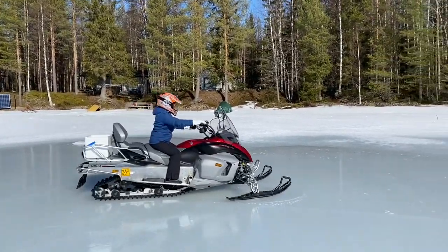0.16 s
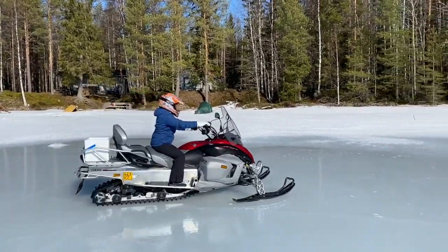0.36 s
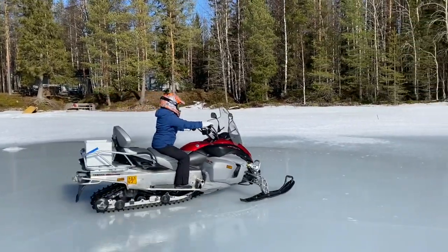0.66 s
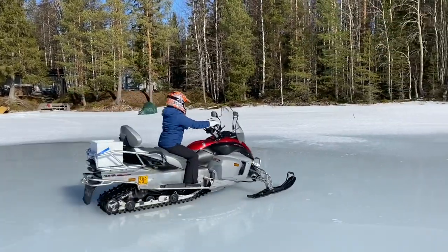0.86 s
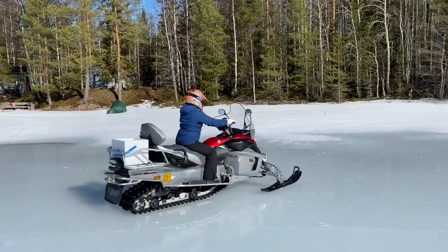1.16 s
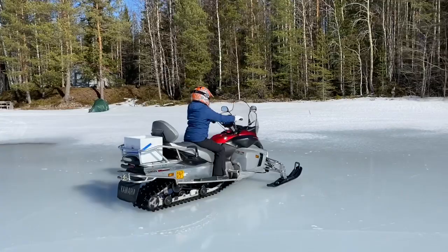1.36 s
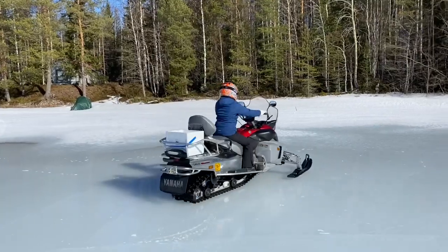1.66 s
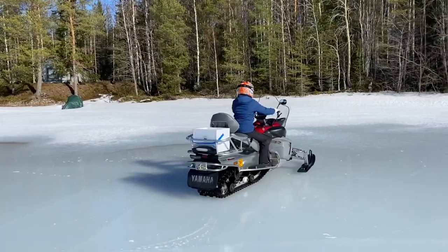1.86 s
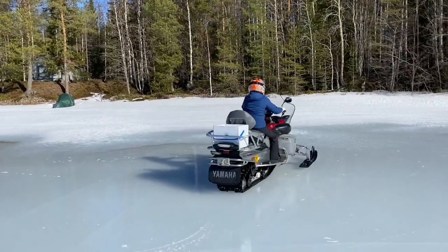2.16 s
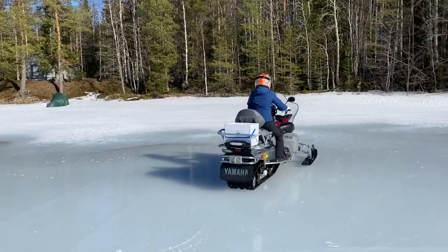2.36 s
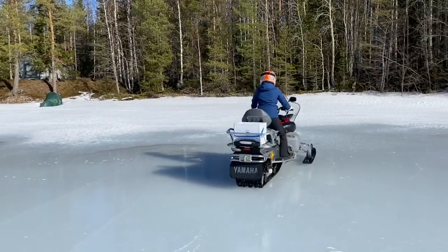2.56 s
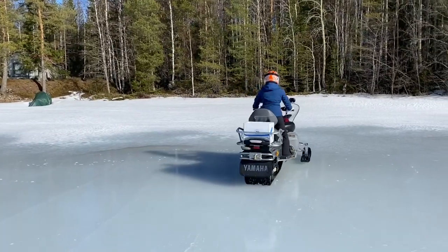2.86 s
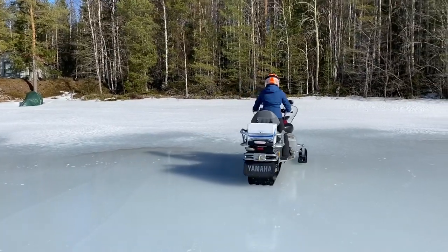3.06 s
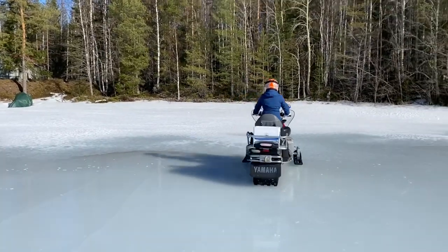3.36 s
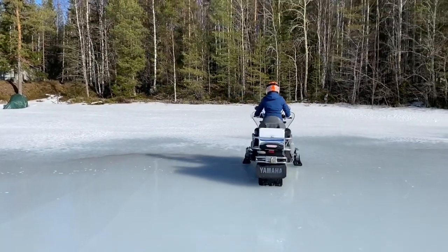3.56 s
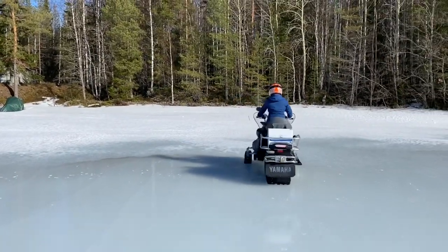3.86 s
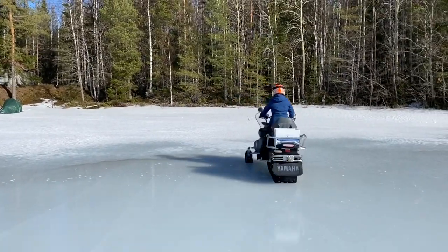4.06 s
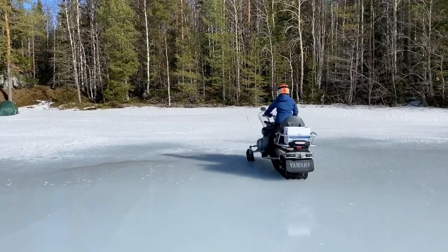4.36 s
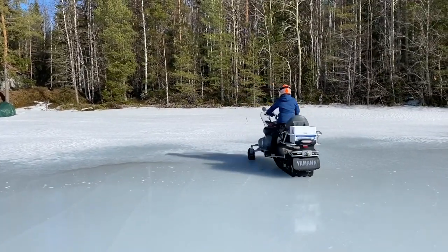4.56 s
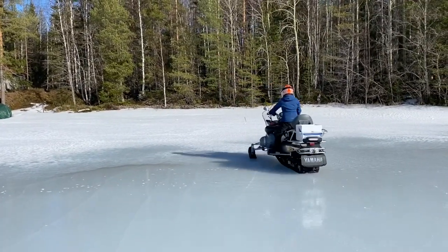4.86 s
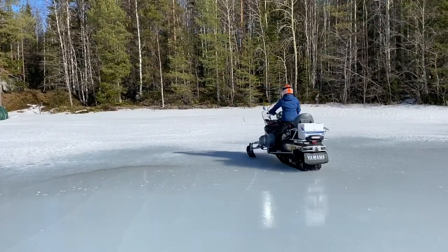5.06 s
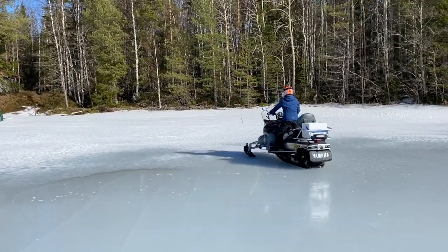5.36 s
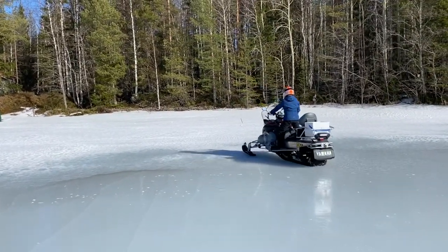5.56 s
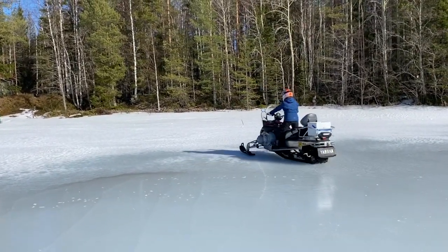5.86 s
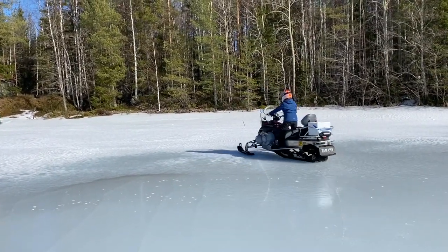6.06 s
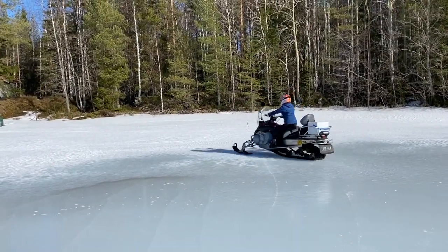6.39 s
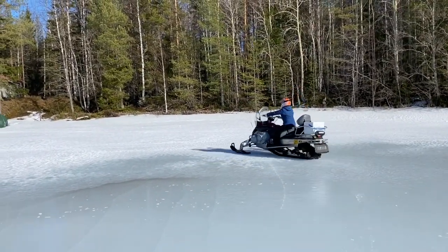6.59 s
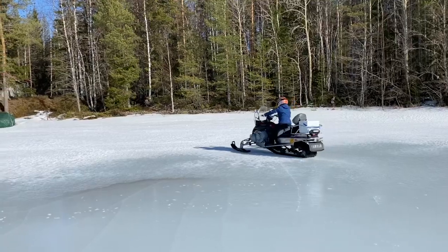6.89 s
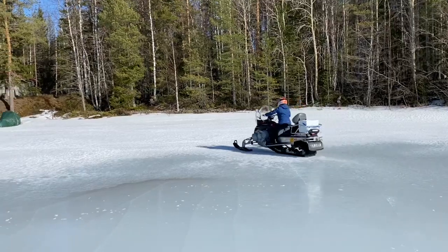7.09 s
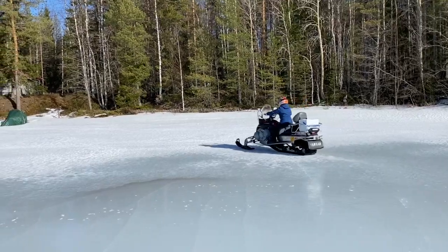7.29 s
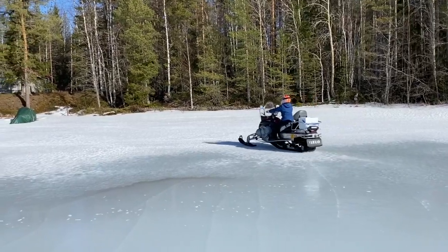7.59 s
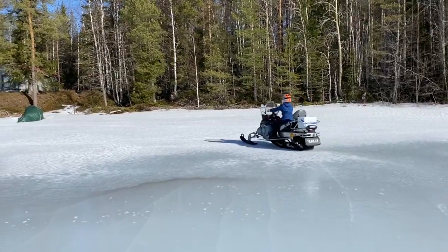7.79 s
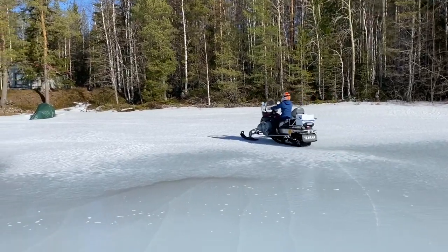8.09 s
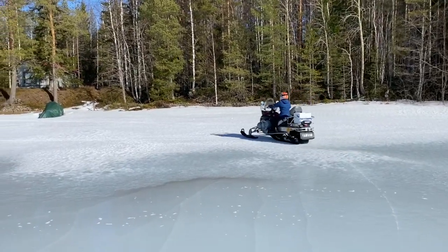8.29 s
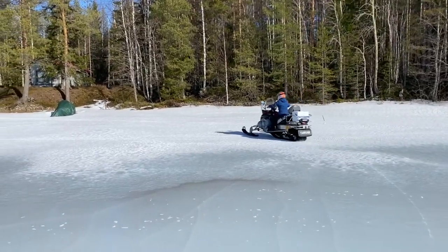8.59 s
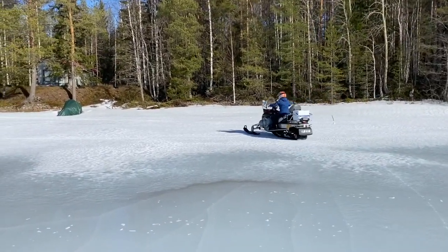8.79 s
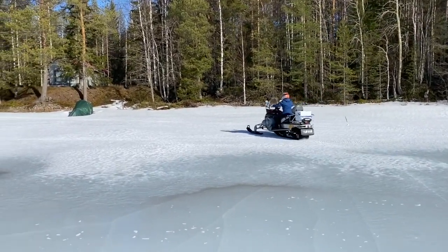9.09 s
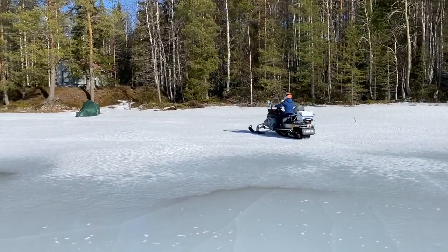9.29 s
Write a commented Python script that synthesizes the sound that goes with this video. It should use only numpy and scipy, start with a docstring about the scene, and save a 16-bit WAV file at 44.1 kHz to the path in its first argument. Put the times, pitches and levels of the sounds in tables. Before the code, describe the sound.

A snowmobile slides to rest and idles with a lumpy double-puff putter on a frozen lake, then revs up, sinks and climbs again.

```python
"""A four-stroke twin snowmobile on a frozen lake, heard by a small microphone with two ports.
First the track slides to rest and the engine idles: each cycle is a double puff from the silencer and a pause,
over a throbbing rattle of valve gear, belt and track, while skis knock on the ice. From 3 s it revs up, the belt
whines, and by 5.9 s it sinks with squeaks; it climbs to 7.9 s, sinks, and picks up again at the end.
Clicks ring silencer, airbox and valve gear; coloured noise makes rumble, roar, rattle, hiss and scrape."""
import sys
import numpy as np
from scipy import signal
from scipy.fft import rfft, irfft
from scipy.io import wavfile
from scipy.ndimage import uniform_filter1d

SR = 44100
rng = np.random.default_rng(int(sys.argv[2]) if len(sys.argv) > 2 else 0)


def wav_out(sig):
    """Save sig, one row per channel (or a flat mono array), as 16-bit PCM at SR to the path in sys.argv[1]."""
    wavfile.write(sys.argv[1], SR, np.round(np.clip(np.atleast_2d(sig).T, -1, 1) * 32767).astype(np.int16))


N = 416304
SECONDS = np.arange(N) / SR
HZ = np.arange(N // 2 + 1) * SR / N


def from_db(db):
    """Decibels to gain."""
    return 10 ** (np.asarray(db) / 20)


def rms_one(x):
    """Scale to unit rms."""
    return x / np.sqrt(np.mean(x ** 2) + 1e-20)


def in_time(rows):
    """Columns of a curve table, one value a sample."""
    s, *columns = np.transpose(rows)
    return [np.interp(SECONDS, s, column) for column in columns]


def at_hz(points):
    """A table over frequency, read at every FFT bin along a logarithmic axis."""
    hz, value = np.transpose(points)
    return np.interp(np.log(HZ + 1), np.log(hz + 1), value)


def filtered(x, order, hz, kind="low"):
    """Butterworth low-pass or high-pass."""
    return signal.sosfilt(signal.butter(order, hz, kind, fs=SR, output="sos"), x)


def drift(corner_hz):
    """Slow chance with spread 1: noise through two equal poles, drawn every 40 samples."""
    r = np.exp(-80 * np.pi * corner_hz / SR)
    slow = signal.lfilter([1], [1, -2 * r, r * r], rng.standard_normal(N // 40 + 2002))
    slow = slow[2000:]   # skip the filter's settling
    return np.interp(np.arange(N) / 40, np.arange(len(slow)), rms_one(slow))


def pole_pair(hz, width_hz):
    """Pole radius and denominator of a two-pole ring."""
    r = np.exp(-np.pi * width_hz / SR)
    return r, [1, -2 * r * np.cos(2 * np.pi * hz / SR), r * r]


def resonance(x, hz, width_hz):
    """Two-pole peak with gain 1 on top."""
    r, poles = pole_pair(hz, width_hz)
    return signal.lfilter([(1 - r * r) / 2, 0, (r * r - 1) / 2], poles, x)


def held_back(x, hz, width_hz):
    """All-pass: delays a band, changes no level."""
    _, poles = pole_pair(hz, width_hz)
    return signal.lfilter(poles[::-1], poles, x)


def evened(x):
    """Slow level divided out, to be played by a level curve."""
    power = uniform_filter1d(uniform_filter1d(x ** 2, size=SR // 6), size=SR // 6)
    return x / np.sqrt(power + 1e-14)


def struck(events, modes, burst_s, spread_db):
    """Each contact is a short burst of grit that rings every mode with a strength of its own."""
    s, peak_db, bright_db = np.transpose(events)
    out, width = np.zeros(N), int(burst_s * SR) + 1
    at = (s * SR).astype(int)[:, None] + np.arange(width)
    luck = rng.standard_normal((len(s), len(modes), width + 1))
    for k, (hz, level_db, t60_s) in enumerate(modes):
        octaves_up = np.log2(max(hz / modes[0][0], 1))   # above the first mode
        own_db = spread_db * np.minimum(luck[:, k, 0], 1.3)
        gain = from_db(peak_db + level_db + bright_db * octaves_up + own_db)
        grit = np.full(N + SR, 1e-18)
        np.add.at(grit, at, gain[:, None] * luck[:, k, 1:] / np.sqrt(width))
        r, turn = from_db(-60 / (t60_s * SR)), 2 * np.pi * hz / SR
        out += signal.lfilter([0, np.sin(turn)], [1, -2 * r * np.cos(turn), r * r], grit[:N])
    return out


# How alike left and right are: pitch_hz, likeness (0-1)
LIKENESS = [(60, .4), (300, .82), (1500, .98), (2600, .9), (3100, .72), (4600, .85), (5500, .7), (6300, .2),
            (7300, .55), (8000, .4), (9500, .5), (11000, .85), (12200, .6), (13300, .98)]
# Covers and tunnel that ring along, each heard best from another side:
# pitch_hz, width_hz, then lift_db in each of the three views
PANELS = [(690, 88, 1.5, 5, 7.5), (860, 130, 4.5, 0.5, 3), (1264, 30, 12, -2, 1), (1640, 143, 10, 8, 5),
          (1837, 130, 1.5, 3.5, 6), (2503, 31, 13, 6.5, 2.5), (2608, 69, -5, 5.5, 7),
          (3153, 90, 11, 9.5, 8), (3835, 150, 7, 5.5, -6.5), (4060, 250, 1, 0.5, 8.5),
          (4300, 88, 9.5, 9.5, -11), (4710, 240, 1, 3, 6), (5100, 490, 4.5, 8, 6.5), (6220, 60, -2, 9, 3),
          (7280, 130, 0, 4, 3), (7660, 130, 2, 0, 4), (8400, 220, 5, 6, 5.5), (10330, 160, -1, -5, 0)]
# The machine turns: start_s, view (0 right flank and tail, 1 tail, 2 left flank)
VIEW = [(0, 0), (3.0, 0), (3.8, 1), (6.4, 1), (7.1, 2), (9.44, 2)]


def noise(spectrum):
    """Stereo noise of a given colour, lifted where the panels in view ring, partly alike in both channels."""
    shared, own = rfft(rng.standard_normal((2, N)))
    alike = np.clip(at_hz(LIKENESS), 0, 1)
    pair = np.sqrt(1 + alike) * shared + np.sqrt(1 - alike) * own * [[1], [-1]]
    lift_db = sum(np.array(db)[:, None] / (1 + (2 * (HZ - hz) / width_hz) ** 2)
                  for hz, width_hz, *db in PANELS)
    view = in_time(VIEW)[0]
    out = 0
    for k, view_lift_db in enumerate(lift_db):
        seen = np.clip(1 - abs(view - k), 0, 1)   # crossfade between neighbouring views
        out = out + seen * rms_one(irfft(pair * from_db(at_hz(spectrum) + view_lift_db), N))
    return out


# The rider's thumb on the throttle: open_s, shut_s, opening (0-1)
THROTTLE = [(3.09, 3.845, 0.32), (3.846, 4.942, 1), (5.95, 7.94, 0.76), (8.718, 8.949, 0.33),
            (9.167, 9.56, 0.75)]


def lever():
    """Throttle opening 0-1; the lever takes a moment to move."""
    def moved(since_s):
        return np.clip((SECONDS - since_s) / 0.084, 0, 1)   # travel time in s
    return sum(wide * (moved(open_s) - moved(shut_s)) for open_s, shut_s, wide in THROTTLE)


# Brief dips of exhaust and rumble: centre_s, half_length_s, dip_db
STUMBLES = [(5.77, 0.013, -1), (5.897, 0.052, -5), (6.046, 0.011, -8), (8.64, 0.049, -3),
            (8.735, 0.011, -20), (9.046, 0.082, -7)]


def stumble_db():
    """The level of exhaust and rumble dips briefly."""
    return sum(db * np.exp(-((SECONDS - s) / half_s) ** 2) for s, half_s, db in STUMBLES)


# Engine speed: start_s, cycles_hz (four-stroke cycles per second)
SPEED = [(0.0, 10.03), (1.4, 10.35), (1.65, 10.65), (2.2, 10.05), (2.75, 10.9), (3.0, 10.5), (3.12, 11.69),
         (3.23, 14.39), (3.33, 19.08), (3.4, 26.09), (3.5, 30.27), (3.58, 31.6), (3.8, 27.43), (3.9, 29.7),
         (4.2, 43.8), (4.6, 56.8), (4.75, 58.91), (4.92, 57), (5.0, 54.34), (5.35, 38.16), (5.7, 25.4),
         (5.85, 17.08), (6.0, 17.0), (6.2, 25.26), (6.4, 29.27), (6.6, 31.61), (6.85, 40.19), (7.1, 46.7),
         (7.85, 56.61), (7.95, 55.6), (8.35, 36.5), (8.66, 26), (8.95, 27.7), (9.1, 22.07), (9.24, 21.8),
         (9.44, 29.56)]
# The exhaust before beat and dips: start_s, level_db, edge_db (sharp edge of the puffs)
EXHAUST = [(0, -29.5, -7.5), (3.05, -28.5, -5), (3.3, -18, -2.5), (3.55, -20.5, -14), (3.72, -25, -13),
           (3.86, -19.5, -12), (4.1, -24, -4.5), (4.5, -24.5, -4), (4.9, -26, -1.5), (5.05, -21.5, 1),
           (5.45, -22.5, 2), (5.87, -29.5, -14.5), (6.0, -27, -2.5), (6.12, -23.5, 1), (6.25, -24.5, 0),
           (6.33, -27, -7.5), (6.52, -26.5, -17), (6.7, -26, 2.5), (7.9, -22.5, -2.5), (8.1, -21, -2),
           (8.45, -23.5, 0.5), (8.6, -26, -2), (8.7, -23, 0.5), (8.8, -23, -4), (9.03, -26, -8),
           (9.3, -23.5, 4), (9.44, -19.5, -10)]
# The engine is heard better from the flank than from behind: start_s, level_db
FLANK = [(0, 2.5), (.5, 2.5), (1.4, 6), (2.2, 0), (3.1, 1.5), (3.3, 0.5), (3.5, -4.5), (3.75, -3),
         (4.6, 3.5), (5.3, 0.5), (5.9, 5), (6.4, 1), (7.2, 5.5), (8, 4.5), (8.6, 5.5), (9.1, 3), (9.44, 2)]
IDLE_HZ = 10.4
THROB_DB, THROB_VARIES = 4.2, .6   # depth at idle before each layer's share, chance share of the throb
TRACK_LAG_S = 0.16   # the track follows the engine late


def engine():
    """Speed, throttle and the throb in dB that the sources follow; strokes run together as speed rises."""
    speed, throttle = in_time(SPEED)[0], lever()
    exhaust_db, edge_db = in_time(EXHAUST)
    cycle = -.25 + np.cumsum(speed) / SR
    octaves = np.log2(speed / IDLE_HZ)
    keep = np.exp(-1 / (TRACK_LAG_S * SR))
    track = signal.lfilter([1 - keep], [1, -keep], speed - IDLE_HZ)
    # lever shut while the engine still turns fast
    overrun = np.clip(1 - throttle * 5.0, 0, 1) * np.clip(octaves, 0, 1)
    depth_db = THROB_DB * (IDLE_HZ / speed) ** 1.35
    throb_db = depth_db * np.cos(2 * np.pi * (cycle + 0.23)) * (1 + THROB_VARIES * drift(13.0))
    beat_db = depth_db * np.cos(2 * np.pi * (cycle + 0.056))   # the bass beats with the puffs themselves
    return dict(cycle=cycle, octaves=octaves, track=track, throttle=throttle, overrun=overrun,
                exhaust_db=exhaust_db, edge_db=edge_db, flank_db=in_time(FLANK)[0], throb_db=throb_db,
                beat_db=beat_db, dip_db=stumble_db(), gusts_db=0.26 * drift(7.0))


def level_law(run, idle_db, per_octave, per_10_hz_track, throttle_open, exhaust_share, flank_share):
    """Level in dB from engine speed, track drive, throttle, exhaust swing and side heard."""
    speed_db = per_octave * run["octaves"] + per_10_hz_track * run["track"] / 10
    driven_db = idle_db + speed_db + throttle_open * run["throttle"]
    swing_db = run["exhaust_db"] + 28   # against an idling exhaust at -28 dB
    return driven_db + exhaust_share * swing_db + flank_share * run["flank_db"]


# Colour of the deep rumble: pitch_hz, level_db (per Hz, relative)
RUMBLE = [(20, -65), (33, -8), (48, 14.5), (100, 6), (280, 2.5), (360, -43), (600, -48)]


def deep_rumble(run):
    """Low noise that beats with the puffs and fades as the machine drifts away."""
    level_db = level_law(run, -32, per_octave=1.4, per_10_hz_track=-1.5, throttle_open=4,
                         exhaust_share=0.89, flank_share=0.43)
    recede_db = -0.9 * SECONDS
    return from_db(level_db + recede_db + 1.54 * run["beat_db"] + run["dip_db"]) * noise(RUMBLE)


# Colour of the hiss: pitch_hz, level_db (per Hz, relative)
HISS = [(2200, 4.5), (2900, -2), (3400, -1), (3800, 0), (4800, -4), (5500, -4), (6300, -11.5), (7400, -6.5),
        (8500, -16.5), (10000, -13), (11500, -21), (14000, -41), (15000, -1), (15800, -20)]
# The treble swells and sinks on its own: start_s, level_db
TREBLE = [(0, -8), (.6, 3.5), (1.4, 1.5), (2.3, 3), (3.1, 1), (3.27, 1.5), (3.42, 5.5), (3.7, -1.5),
          (4.1, -1), (4.6, 1), (5.1, -0.5), (5.6, 0), (6.15, 0.5), (6.5, 0.5), (7.3, -2.5), (7.9, -0.5),
          (8.5, -3.5), (9.1, 0), (9.44, 1)]


def hiss(run):
    """High noise that throbs with the cycle."""
    level_db = level_law(run, -59.5, per_octave=3.5, per_10_hz_track=0.82, throttle_open=3,
                         exhaust_share=0.63, flank_share=0.64)
    flicker_db = run["gusts_db"] + 0.81 * drift(49)
    return from_db(level_db + in_time(TREBLE)[0] + 1.04 * run["throb_db"] + flicker_db) * noise(HISS)


# Colour of the track's scrape: pitch_hz, level_db (per Hz, relative)
SCRAPE = [(300, -16), (600, 7), (1500, -6), (2200, -6), (3000, -15.5), (4500, -17.5), (6700, -19),
          (8000, -29), (12000, -25), (15800, -32)]
# The track slides to rest on the ice: start_s, level_db
SLIDE = [(0, -39.5), (.1, -42), (.2, -43.5), (.28, -44.5), (.38, -46), (.45, -61), (.62, -51.5), (.7, -59),
         (.79, -48), (.9, -55), (1.1, -80)]


def track_slide():
    """Scraping noise that flickers as it dies away."""
    level_db = in_time(SLIDE)[0]
    sounding = level_db > -74
    return sounding * from_db(level_db + 2.0 * drift(56) + 1.86 * drift(15)) * noise(SCRAPE)


# Skis knock on the ice at first; from 4 s, as the engine revs, the track's lugs slap: start_s, peak_db
# (relative), brightness_db (per octave)
KNOCKS = [(0.025, -41, -3.5), (0.085, -36, 0), (0.21, -40, -4), (0.275, -38, -4), (0.364, -41, -0.5),
          (0.466, -48, -4), (0.62, -40, -3), (0.76, -43, -3), (0.789, -38, 0), (0.82, -48.5, -8),
          (1.147, -41.5, 3), (1.362, -43, 6), (1.384, -49, -2), (1.408, -36, 7), (1.416, -42, 5),
          (1.45, -57, 0), (1.475, -45, 5), (1.487, -39.5, 4), (1.495, -40, 4.5), (1.503, -37, 0),
          (1.528, -42, 2), (1.557, -44, 8), (1.82, -47, 0), (2.082, -39, -4), (2.371, -29, -6),
          (2.392, -35, 5), (2.414, -33.5, -4), (2.429, -41, -6), (2.796, -46, -4), (4.088, -39, -4),
          (4.397, -29, -13), (5.134, -34, -4), (5.989, -37, -0.5), (7.246, -29, -11), (8.509, -30, -9),
          (8.55, -28, -11), (8.736, -33, -9), (9.347, -31, -9)]
# Modes of the skis: pitch_hz, level_db, t60_s
SKI_MODES = [(776, 10, 0.037), (587, -2.5, 0.022), (123, 19.5, 0.022), (890, 0, 0.051), (1155, 2, 0.034),
             (1430, 1.5, 0.03), (1890, 1, .015), (2440, 0, 0.0036)]


def knocks():
    """Short contacts with the ice, first of the skis and later of the track's lugs, ring the modes of the skis."""
    return struck(KNOCKS, SKI_MODES, 0.0051, spread_db=3.0) * from_db(-7.0)


# The belt whines as the clutch takes up and lets go: start_s, pitch_hz, level_db (before waver and throb)
WHINE = [(3.25, 4300, -80), (3.4, 4450, -67), (3.55, 4570, -59), (3.68, 4500, -56), (3.8, 4470, -75),
         (5.2, 5000, -80), (5.5, 4870, -65), (5.75, 4590, -51), (5.86, 4340, -54), (6.0, 3820, -57),
         (6.1, 3700, -85), (8.5, 4870, -72), (8.64, 4720, -52), (8.8, 4650, -57), (8.9, 4600, -68),
         (9.0, 4600, -80)]


def belt_whine():
    """A narrow band of noise carried on a moving pitch."""
    hz, level_db = in_time(WHINE)
    wobble = filtered(rng.standard_normal((2, N)), 2, 250)
    turn = 2 * np.pi * np.cumsum(hz) / SR
    band = rms_one(wobble[0] * np.cos(turn) + wobble[1] * np.sin(turn))
    sounding = level_db > -74
    return sounding * from_db(level_db + 1.8 * drift(30)) * band


# Belt slips: start_s, peak_db (relative), brightness_db (per octave)
SQUEAKS = [(5.714, -54, 1), (5.852, -40, -7), (5.866, -45, -1), (5.8895, -44.5, 1.5), (5.9, -47, -2),
           (5.9244, -48, -1), (5.962, -58, 0), (6.145, -49, -1), (8.648, -56, -8), (8.785, -51, -8)]
# Modes of the squeaking belt: pitch_hz, level_db, t60_s
SQUEAK_MODES = [(4240, 8, .03), (4760, 5, 0.026), (6270, -3, 0.03), (7340, 1, .025), (8900, -3, 0.027),
                (10400, -4, 0.027)]


def belt_squeaks():
    """Each slip of the belt is a burst of grit that rings high modes."""
    return struck(SQUEAKS, SQUEAK_MODES, 0.014, spread_db=2.0) * from_db(-1.0)


# The chassis rocks once a cycle: start_s, level_db (before waver)
ROCKING = [(0, -43), (1.4, -32), (3.4, -45), (4.0, -33.5), (4.9, -25), (5.05, -48), (5.65, -34), (6.1, -49),
           (7.4, -39), (7.9, -35), (8.1, -58), (9.44, -65)]


def chassis_rocking(run):
    """A wavering sine at the cycle rate."""
    level_db = in_time(ROCKING)[0] + 1.1 * drift(5.5)
    return from_db(level_db) * np.sqrt(2) * np.sin(2 * np.pi * run["cycle"])


# Colour of the rattle: pitch_hz, level_db (per Hz, relative)
RATTLE = [(350, 1), (600, 1), (700, 1.5), (900, -2.5), (1100, -2.5), (1450, -7.5), (1700, -12.5),
          (2000, -8), (2600, -17), (2900, -25.5), (4000, -30)]


def rattle(run, level_db):
    """Valve gear, belt and track as noise that throbs with the cycle."""
    flicker_db = run["gusts_db"] + 0.52 * drift(47)
    return from_db(level_db + 0.66 * run["throb_db"] + flicker_db) * noise(RATTLE)


PIPE_LEAD_S = .028   # the slow low ring makes a puff peak this long after the valve opens


def puffs(run):
    """Two firings and a weaker intake gulp each cycle, uneven in time and strength, as clicks."""
    def ridden(idle, throttle, overrun):
        return idle + throttle * run["throttle"] + overrun * run["overrun"]
    spacing = ridden(.23, throttle=-0.016, overrun=0.03)   # in cycles
    gulp = ridden(0.2, throttle=0.37, overrun=0.028)
    uneven_db = ridden(1.3, throttle=.2, overrun=.3)
    cycle = run["cycle"]
    count = int(cycle[-1]) + 1
    start = np.minimum(np.searchsorted(cycle, np.arange(count)), N - 1)
    luck = rng.standard_normal((count, 2, 3))
    clicks = np.full(N, 1e-18)
    for k, strength in enumerate([1, 1.1, gulp[start]]):
        place = np.arange(count) - .14 + k * spacing[start]
        place += 0.0047 * uneven_db[start] * luck[:, 0, k]
        at = np.searchsorted(cycle, place) - int(PIPE_LEAD_S * SR)
        inside = (at > 0) & (place < cycle[-1])
        size = strength * from_db(uneven_db[start] * luck[:, 1, k])
        np.add.at(clicks, at[inside], size[inside])
    return clicks


# Modes of valve gear and covers: pitch_hz, level_db, t60_s
VALVE_MODES = [(798, 0.5, 0.02), (1233, -5, 0.017), (1658, -6, 0.028), (2340, -19, 0.018),
               (3230, -13, 0.012), (3670, -16, 0.016), (4220, -19.5, 0.015), (4660, -14.5, 0.022),
               (7500, -27, 0.016), (10400, -22, 0.012)]
TICK_DB, TICK_DB_PER_OCTAVE = 5.5, -3.5   # peak over the rattle at idle, change with engine speed
TICK_LATE_S = .008   # lag after the click


def valve_ticks(run, clicks, rattle_db):
    """Every stroke knocks the valve gear, never twice alike."""
    at = np.flatnonzero(clicks > 1e-9)
    peak_db = (rattle_db + TICK_DB + TICK_DB_PER_OCTAVE * run["octaves"])[at]
    strokes = np.transpose([at / SR + TICK_LATE_S, peak_db, np.zeros(len(at))])
    return struck(strokes, VALVE_MODES, 0.008, spread_db=4.5)


# Resonances of the airbox, each passed twice: pitch_hz, width_hz (per pass), level_db
AIRBOX_RING = [(328.6, 62, 4.5), (455, 71, 6.5), (533, 37, 2.5), (666, 45, -1), (869, 74, -9.5)]


def growl(clicks):
    """The same strokes ring the airbox: higher engine orders."""
    return evened(sum(from_db(db) * resonance(resonance(clicks, hz, width_hz), hz, width_hz)
                      for hz, width_hz, db in AIRBOX_RING))


# Colour of the airbox rush: pitch_hz, level_db (per Hz, relative)
AIRBOX = [(330, 1), (400, -5.5), (465, 2), (530, -1.5), (610, -6.5), (750, -46)]
# Airbox roar, setting growl and rush together: start_s, level_db
ROAR = [(0.0, -39), (0.02, -45), (0.34, -55), (2.28, -62), (3.81, -47), (4.1, -31), (4.26, -35.5),
        (5.1, -31.5), (5.91, -46.5), (6.42, -40.5), (6.54, -48), (6.68, -36), (8.02, -33), (8.41, -41),
        (8.91, -35), (8.99, -44.5), (9.18, -45.5), (9.44, -33)]


def airbox_roar(run, clicks):
    """The airbox growls with the strokes and rushes with noise."""
    orders = .85 * from_db(1.2 * drift(22)) * growl(clicks)
    rush = from_db(2.5 + 0.3 * run["throb_db"] + 1.2 * drift(23.0)) * noise(AIRBOX)
    return from_db(in_time(ROAR)[0]) * (orders + rush)


# Chambers of the silencer: pitch_hz, width_hz, level_db
SILENCER = [(85.8, 23.2, 2), (127.4, 29.4, 0.5), (162.4, 28.2, -1), (215.2, 54.7, -5), (251, 30.6, -0.5),
            (287, 42.3, -5)]
UPPER_CHAMBERS_HZ = 200   # chambers above this answer to the sharp edge of a puff
SILENCER_TOP_HZ, SILENCER_FOOT_HZ = 311, 82


def exhaust(run, clicks):
    """The puffs ring the silencer's chambers; the long pipe delays a band so each puff slides downward."""
    rung = 0
    for k, (hz, width_hz, db) in enumerate(SILENCER):
        gain = from_db(db + run["edge_db"] * (hz > UPPER_CHAMBERS_HZ))
        rung = rung + (-1) ** k * gain * resonance(clicks, hz, width_hz)
    rung = filtered(rung, 4, SILENCER_TOP_HZ)
    rung = filtered(rung, 4, SILENCER_FOOT_HZ, "high")   # lows come late and ring on
    for _ in range(2):
        rung = held_back(rung, 102.8, width_hz=120)
    return from_db(run["exhaust_db"] + run["dip_db"] + 0.36 * run["beat_db"]) * evened(rung)


def scatter(x):
    """Ice, snow banks and bodywork scatter short clouds of low, changing echoes, opposite left and right."""
    t = np.arange(SR // 8) / SR
    fade = from_db(-60 * t / .05) * (t > .002)   # 60 dB down in 0.05 s
    cloud = rng.standard_normal((2, len(t))) * fade
    cloud = cloud / np.sqrt(np.sum(cloud ** 2, axis=1, keepdims=True))
    dull = filtered(x, 1, 190)
    one, other = signal.fftconvolve(dull[None], cloud, axes=1)[:, :N]
    turn = 2 * np.pi * 1.3 * SECONDS + 1.8 * drift(1.55)   # the echoes change as the machine turns
    return from_db(-5) * (one * np.cos(turn) + other * np.sin(turn)) * np.array([[1], [-1]])


def scene():
    """Engine, belt, track and skis on the ice."""
    run = engine()
    clicks = puffs(run)
    rattle_db = level_law(run, -54, per_octave=1.38, per_10_hz_track=3, throttle_open=0.5,
                          exhaust_share=0.5, flank_share=0.8)
    background = deep_rumble(run) + hiss(run) + track_slide()
    belt = belt_whine() * from_db(0.4 * run["throb_db"]) + belt_squeaks()
    machine = chassis_rocking(run) + rattle(run, rattle_db) + valve_ticks(run, clicks, rattle_db)
    near = knocks() + exhaust(run, clicks)
    return background + belt + machine + airbox_roar(run, clicks) + near + scatter(near)


# Phase between the microphone ports: pitch_hz, left_lead_rad
PORT_PHASE = [(0, .05), (1800, .05), (2100, .9), (2700, .8), (3000, 2.2), (3800, .3), (4300, -.3),
              (5100, 2), (5800, .5), (6700, -3.2), (7500, -1.9), (8200, 2.1), (10500, 0), (11600, 0),
              (12600, -3), (14300, -3.4), (15200, -6.3)]
# Level between the microphone ports: pitch_hz, left_minus_right_db
PORT_BALANCE = [(60, -2.5), (150, -2), (1300, -3), (2300, -4.5), (2800, 7), (3300, -1), (3900, 9),
                (4600, -8.5), (5300, 5), (5800, -6.5), (6900, 7), (7700, -1.5), (8000, -2), (8500, -1),
                (10000, 0)]
MIC_FOOT_HZ, CUTOFF_HZ = 52, 16100
TOP_LEVEL = .6   # peaks are rounded towards this


def record(dry):
    """Two ports on a small body differ in phase and level; deep bass and top are cut, peaks rounded."""
    half = from_db(at_hz(PORT_BALANCE) / 2) * np.exp(.5j * at_hz(PORT_PHASE))
    to_end = np.minimum(np.arange(N), np.arange(N)[::-1])
    edges = np.minimum(1, to_end / (.003 * SR))   # both ends fade in 3 ms
    ports = irfft(rfft(dry * edges) * np.array([half, 1 / half]), N)
    ports = filtered(ports, 2, MIC_FOOT_HZ, "high")
    ports = TOP_LEVEL * np.tanh(ports / TOP_LEVEL)
    return signal.sosfilt(signal.cheby2(12, 70, CUTOFF_HZ, fs=SR, output="sos"), ports)


dry = scene()
out = record(dry)
wav_out(out)
```